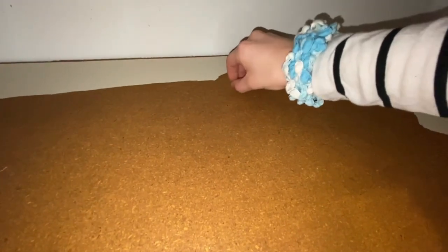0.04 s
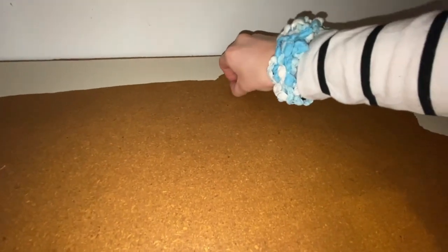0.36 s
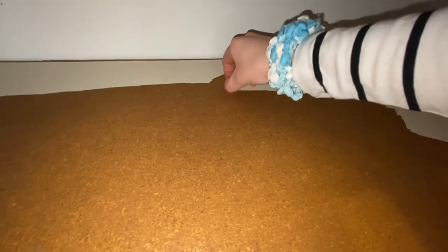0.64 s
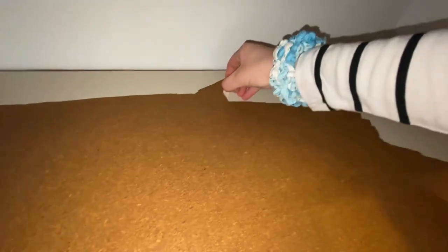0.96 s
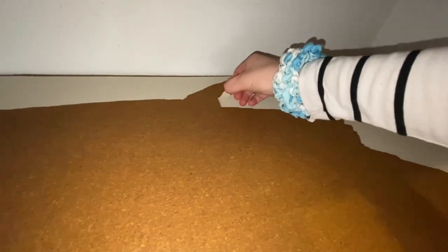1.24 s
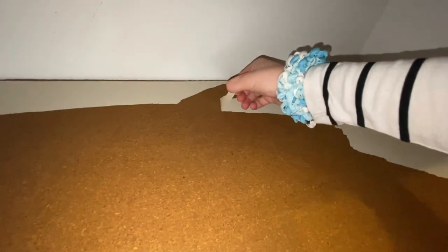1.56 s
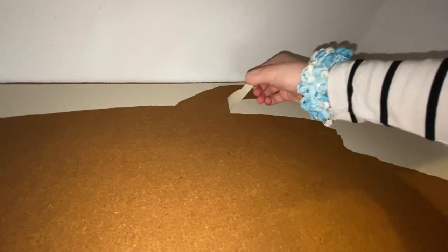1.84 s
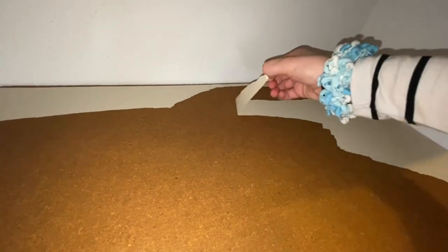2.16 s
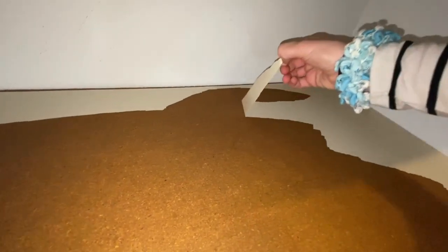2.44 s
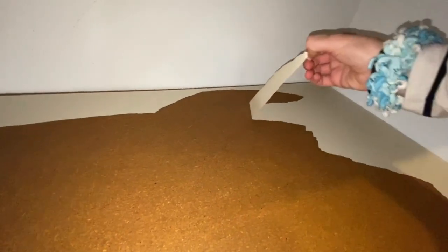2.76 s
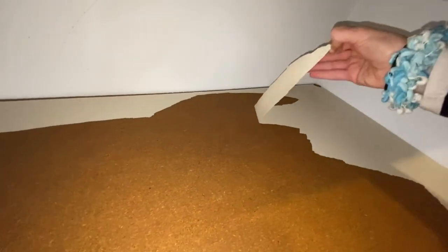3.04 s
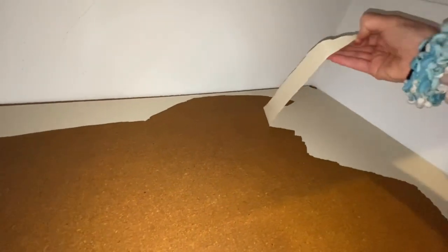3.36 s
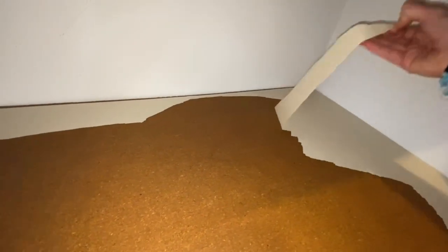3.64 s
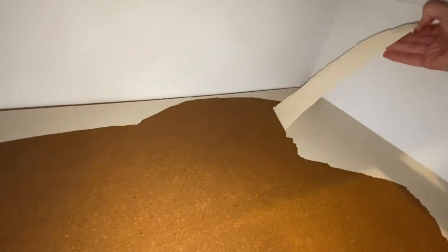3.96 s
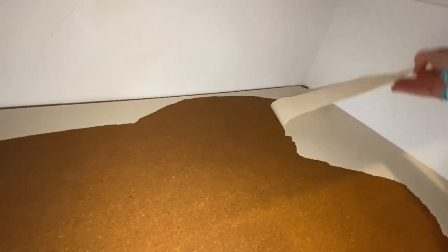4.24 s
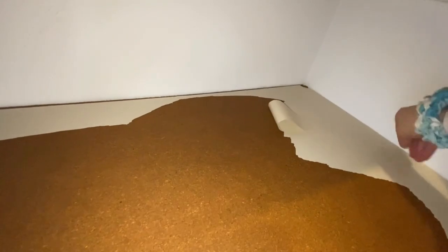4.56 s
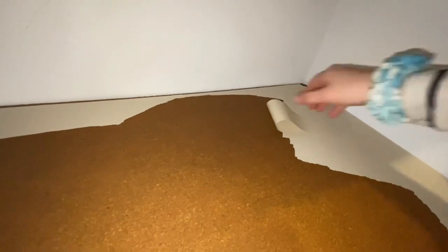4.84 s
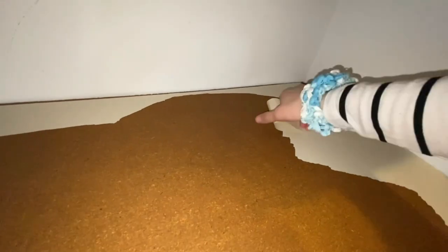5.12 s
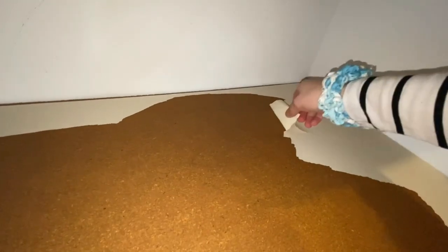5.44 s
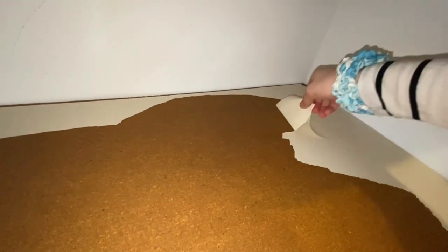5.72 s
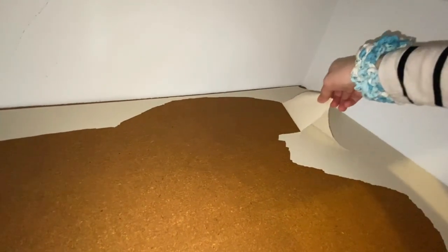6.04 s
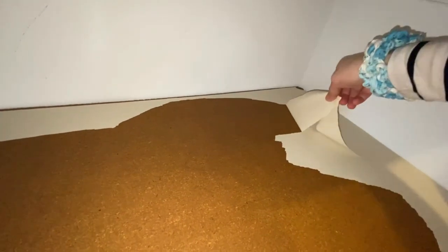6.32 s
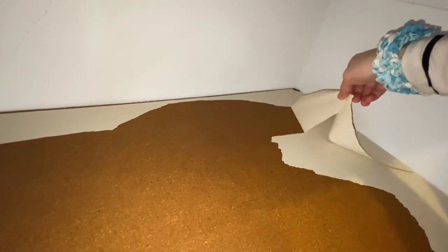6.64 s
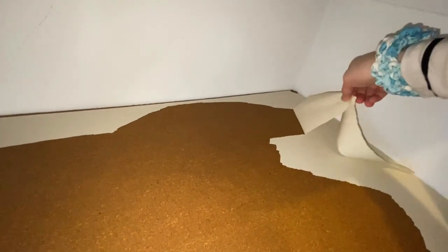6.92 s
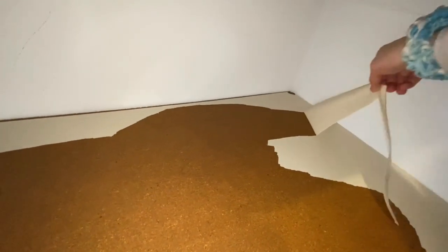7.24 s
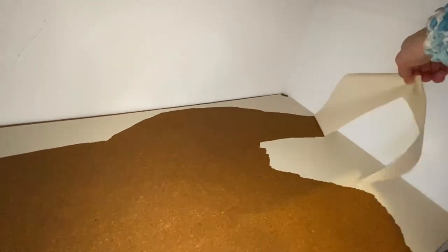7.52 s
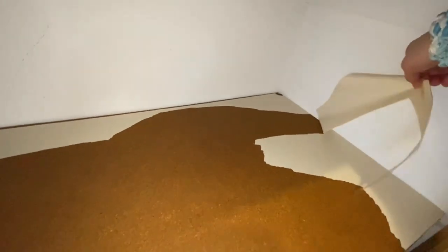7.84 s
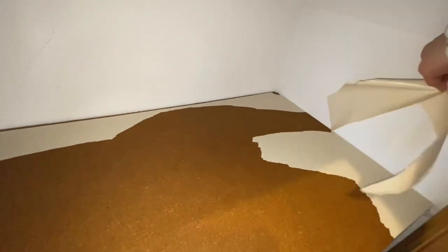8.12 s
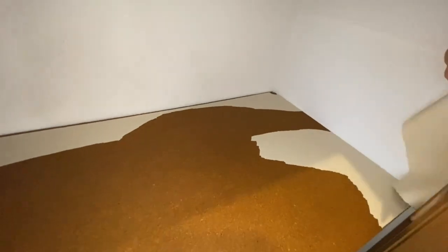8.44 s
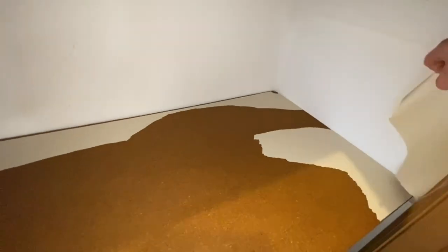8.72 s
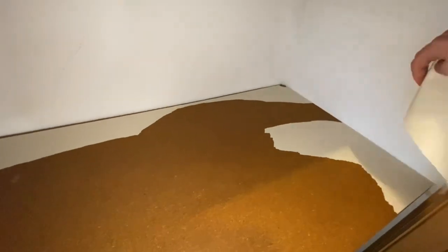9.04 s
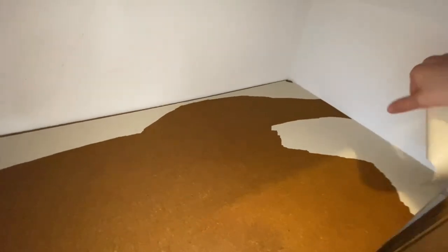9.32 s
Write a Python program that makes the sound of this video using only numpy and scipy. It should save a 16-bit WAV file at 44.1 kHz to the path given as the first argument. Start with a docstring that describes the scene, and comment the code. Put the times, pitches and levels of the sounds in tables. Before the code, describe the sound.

Faint fingertip scuffs on paper lead into a soft, fizzy crackle as a strip of shelf liner slowly unsticks. The hand bumps the closet with a low thud. After a brief lull the paper is pulled much harder, tearing off in quick, dry, uneven rips that grow denser, then crinkling and sliding over the wooden shelf once free. It is heard from close by in a small closet in a quiet house.

```python
"""In a closet, old paper liner is peeled by hand off a rough shelf. A slow pull hisses as the glue parts
in countless tiny fractures, until the strip comes free and the hand drops with a thud. A second, harder
pull goes in a run of rips, and stick-slip friction sets the shelf board humming. At the end the loose
sheet rustles as it slides and buckles, and its edge taps on the wood. The near walls reflect the sound."""
import sys
import numpy as np
from scipy import signal
from scipy.fft import rfft, irfft
from scipy.io import wavfile

SR = 44100
rng = np.random.default_rng(int(sys.argv[2]) if len(sys.argv) > 2 else 0)


def digitize_waveform(pressure):
    """Quantize a signal to 16-bit integers and store it at the path in sys.argv[1].

    Rows of a 2-D input are taken as channels; values are limited to [-1, 1].
    """
    field = np.atleast_2d(pressure).T
    bounded = np.clip(field, -1, 1)
    quanta = np.round(bounded * 32767).astype(np.int16)
    wavfile.write(sys.argv[1], SR, quanta)


N = 422478
TIME = np.arange(N) / SR


def from_db(db):
    """Amplitude ratio of a level in decibels."""
    return 10 ** (np.asarray(db) / 20)


def rms_one(x):
    """Normalisation to unit mean power."""
    return x / np.sqrt(np.mean(x ** 2) + 1e-20)


def at_hz(points, hz):
    """Interpolation on a logarithmic frequency axis."""
    points = np.array(points)
    return np.interp(np.log(np.maximum(hz, 1)), np.log(points[:, 0]), points[:, 1])


def curve(rows):
    """Gain envelope, interpolated in decibels."""
    return from_db(np.interp(TIME, *np.transpose(rows)))


def swells(rows, attack_s, release_s):
    """Envelopes with a linear attack, a hold and an exponential release."""
    out = np.zeros(N)
    for s, length, db in rows:
        attack = np.clip((TIME - s) / attack_s, 0, 1)
        release = np.exp(-np.clip((TIME - s - length) / release_s, 0, 20))
        out += from_db(db) * attack * release
    return out


def drift(rate):
    """Slow random modulation: Gaussian values, rate per second, joined by lines."""
    return np.interp(TIME * rate, np.arange(N // 20), rng.standard_normal(N // 20))


def butter(x, hz, kind, order=2):
    """Butterworth filter: a maximally flat passband."""
    sections = signal.butter(order, np.clip(hz, 10, .48 * SR), kind, fs=SR, output="sos")
    return signal.sosfilt(sections, x + 1e-18)


def coloured(x, spectrum, size=8192):
    """Minimum-phase spectral shaping; white noise keeps its power."""
    gain = rms_one(from_db(at_hz(spectrum, np.fft.rfftfreq(size, 1 / SR))))
    cepstrum = irfft(np.log(gain))[:size // 2]
    cepstrum[1:] *= 2
    return signal.oaconvolve(x, irfft(np.exp(rfft(cepstrum, size))))[:N]


def resonate(x, modes):
    """Modal superposition: damped resonators share the power of a white input."""
    out, total = 0, 0
    for k, (hz, width, db) in enumerate(modes):
        r = np.exp(-np.pi * width / SR)
        ring = signal.lfilter([1, 0, -1], [1, -2 * r * np.cos(2 * np.pi * hz / SR), r * r], x + 1e-18)
        out = out + (-1) ** k * from_db(db) * np.sqrt((1 - r * r) / 2) * ring
        total += from_db(db) ** 2
    return out / np.sqrt(total)


def fibres(per_s, spread_db, catch_db, catch_rate):
    """Shot noise of unit rms: tiny uneven breaks, swelling as the contact catches and slips."""
    sizes = from_db(spread_db * np.minimum(rng.exponential(1, N), 4)) * rng.choice([-1, 1], N)
    breaking = rng.random(N) < per_s / SR
    return rms_one(sizes * breaking * from_db(catch_db * drift(catch_rate)))


RISE_SHARE, TREBLE_HZ = .25, 6850   # build-up as a share of a burst's length; corner of its treble


def bursts(rows, crack_db):
    """Fracture avalanches: breaks build up to a sharp crack, then decay exponentially."""
    out, crackle = np.zeros(N), fibres(per_s=26000, spread_db=2, catch_db=2, catch_rate=1200)
    for s, db, length, treble_db in rows:
        at = int(s * SR)
        grains = crackle[at:at + SR // 12]
        t, rise = TIME[:len(grains)], RISE_SHARE * length
        fade = np.exp(-t / length)
        burst = rms_one(grains * fade * (1 - np.exp(-t / rise))) * np.sqrt(np.mean(fade ** 2))
        burst[int(rise * SR)] += from_db(crack_db)
        burst += (from_db(treble_db) - 1) * butter(burst, TREBLE_HZ, "high", order=1)
        out[at:at + len(burst)] += from_db(db) * burst
    return out


def blows(rows, contact_s):
    """Impact pulses: bandwidth is inversely proportional to contact time."""
    out = np.zeros(N)
    for s, db in rows:
        out[int(s * SR)] = from_db(db)
    return butter(out, 1 / (2 * contact_s), "low")


# Background of the quiet house: (frequency [Hz], spectral level [dB])
AIR_SPECTRUM = [(25, -22), (45, -4), (60, 2.5), (90, -10), (130, -10), (200, -27), (350, -24.5), (700, -34),
                (1500, -38), (3000, -47.5), (8000, -56), (16000, -59)]


def house_air():
    """Ambient noise: a low rumble, partly coherent between left and right."""
    shared, apart = (coloured(noise, AIR_SPECTRUM) for noise in rng.standard_normal((2, N)))
    return from_db(-56) * (shared + from_db(-6.5) * apart * [[1], [-1]])


# Spells of stick-slip on the board: (start [s], duration [s], level [dB])
BOARD_GROANS = [(.05, 0.089, -40), (.26, 0.017, -42), (.56, .33, -53), (1.45, 0.41, -56),
                (2.55, 0.21, -46.5), (2.92, 0.2, -42.5), (3.62, 0.19, -42.5), (5.4, 0.12, -47.5),
                (5.63, 0.11, -35.5), (5.8, 0.1, -35), (5.99, 0.27, -36), (6.46, 0.13, -32.5),
                (6.87, 0.31, -31), (7.26, 0.34, -36)]
# Modes of the shelf board: (frequency [Hz], bandwidth [Hz], level [dB])
BOARD_MODES = [(55, 6.6, -1), (92.3, 86, 4), (131, 13, 0), (181.1, 8.7, 4.5), (253, 96, 2),
               (319.8, 14.5, 3), (347, 28, -1), (520, 180, -6.5)]
BOARD_FOLLOWS = .32   # share of a tug's swing in dB that reaches the board as jolts


def shelf_board():
    """Stick-slip excitation: the peel line shakes the board's modes and sustains a wavering hum."""
    slips = fibres(per_s=1500, spread_db=1.5, catch_db=3, catch_rate=35)
    slow, hard = slow_pull(), hard_pull()
    swing = swells(BOARD_GROANS, attack_s=.024, release_s=.065) + from_db(-8) * slow + from_db(-9) * hard
    hum_hz = 125.5 + 3 * drift(22)
    tone = np.sqrt(2) * np.sin(2 * np.pi * np.cumsum(hum_hz) / SR)
    hum = swing * from_db(-4 + 1.4 * drift(35)) * tone
    rumble = from_db(-14.5) * swing * rms_one(butter(slips, 91, "low"))
    shaking = slips * (from_db(-1) * slow * curve(STRIP_GROWTH) + from_db(-16) * swing)
    jolts = butter(slips * from_db(-27.5) * hard ** BOARD_FOLLOWS, 204, "high")
    return hum + rumble + resonate(shaking + jolts, BOARD_MODES)


# Soft bumps of hand and arm on the closet: (time [s], level [dB])
HAND_BUMPS = [(0.089, -44), (4.265, -5), (9.06, -26), (9.495, -20.5), (9.54, -52)]
# Modes of the closet panels: (frequency [Hz], bandwidth [Hz], level [dB])
PANEL_MODES = [(57.3, 9.2, 2), (96, 93, 9.5), (137.2, 6.8, 6), (168.3, 12, -8), (235, 180, 4.5),
               (339.4, 9.7, -1), (694, 240, -1)]


def thuds(shudder_db, shudder_s):
    """Impact excitation: a soft blow rings the panels' low modes, and a dull shudder dies away."""
    push, t = blows(HAND_BUMPS, contact_s=.0014), TIME[:SR // 2]
    shudder = butter(rng.standard_normal(len(t)), 510, "low") * np.exp(-t / shudder_s)
    return resonate(push + from_db(shudder_db) * signal.fftconvolve(push, shudder)[:N], PANEL_MODES)


# Small dry ticks close to the listener: (time [s], level [dB])
NEAR_TICKS = [(0.1216, -45), (.187, -53), (0.195, -32.5), (0.2067, -32.5), (0.228, -38), (.262, -56),
              (.27, -50), (.389, -50), (.564, -54), (0.8704, -50), (4.47, -26.5)]


def near_ticks():
    """Short contact: a very brief pulse reaches far into the treble and is heard as a bright tick."""
    return butter(blows(NEAR_TICKS, contact_s=.00005), [4500, 9500], "band")


# The hand nudges the paper against the wood: (time [s], level [dB], decay time [s])
HAND_SCUFFS = [(0.33, -45.5, 0.017), (0.786, -44, 0.016), (0.868, -49.5, .008), (4.083, -64, 0.0067),
               (4.391, -43, 0.013), (5.195, -44.5, 0.0076), (5.352, -42.5, .012)]
# Passband of a scuff: (lower edge [Hz], upper edge [Hz])
SCUFF_BAND = [350, 2230]
# Fingertips feel for the paper's edge: (start [s], duration [s], level [dB])
FINGER_STROKES = [(.68, 0.017, -61), (5.078, 0.01, -62), (5.2, 0.01, -57), (5.243, 0.06, -55),
                  (5.38, .04, -49)]
# Skin rubbing on paper: (frequency [Hz], spectral level [dB])
SKIN_SPECTRUM = [(500, -41), (1200, -12), (2500, -4.5), (4300, 0.5), (5500, -3), (7500, -4), (10000, -8.5),
                 (16000, -13)]


def fingers():
    """Friction noise: skin brushes brightly over paper, and paper scuffs dully against wood."""
    friction = fibres(per_s=9000, spread_db=1.5, catch_db=1.5, catch_rate=120)
    scuffs = bursts([(s, db, length, 0) for s, db, length in HAND_SCUFFS], crack_db=-3)
    strokes = swells(FINGER_STROKES, attack_s=.0067, release_s=.035)
    return coloured(strokes * friction, SKIN_SPECTRUM) + from_db(4) * butter(scuffs, SCUFF_BAND, "band")


# Pace of the slow pull, as the strength of its fizz: (time [s], level [dB])
PULL_LEVELS = [(.45, -84), (.61, -61.5), (.73, -63), (.8, -49.5), (.85, -64.5), (.95, -55), (1.14, -60.5),
               (1.27, -50), (1.39, -56), (1.52, -48.5), (1.82, -48.5), (1.9, -45), (1.95, -48),
               (2.04, -45.5), (2.14, -51.5), (2.3, -42.5), (2.38, -45), (2.47, -43), (2.66, -44.5),
               (2.82, -51.5), (2.89, -43), (3.04, -48.5), (3.16, -39), (3.29, -49), (3.37, -43.5),
               (3.49, -50), (3.62, -39.5), (3.83, -52.5), (4.04, -68.5), (4.2, -93)]


def slow_pull():
    """Amplitude envelope of the slow pull, ending as the strip comes free."""
    return curve(PULL_LEVELS) * (TIME < PULL_LEVELS[-1][0])


# Parting glue: (frequency [Hz], spectral level [dB])
GLUE_SPECTRUM = [(150, -15), (400, -27), (800, -14.5), (1200, -13), (1600, -6), (2100, -4.5), (3000, -6.5),
                 (3500, -5), (3900, -5), (5000, -5.5), (6700, 2.5), (8000, -2.5), (9300, -4.5),
                 (12000, -5.5), (16000, -11)]
# Lows and mids of the strip, thin while it is short: (time [s], level [dB])
STRIP_GROWTH = [(.6, -4.5), (1.3, -12), (2.0, 0), (3.6, 1.5)]


def slow_peel():
    """Acoustic emission of parting glue and fibres; returns the fizz and the force on the sheet."""
    pull, body = slow_pull(), curve(STRIP_GROWTH)
    fine = pull * fibres(per_s=5100, spread_db=-3, catch_db=2.5, catch_rate=190)
    coarse = pull * fibres(per_s=300, spread_db=2, catch_db=2.5, catch_rate=60)
    breaks = from_db(-.5) * fine + from_db(-2) * coarse
    ring = peel_line_ring(breaks, hz=5270, width_hz=160, spread=.016, rate=6.4)
    fizz = coloured(breaks, GLUE_SPECTRUM) + from_db(-11) * ring
    fizz += (body - 1) * butter(fizz, 7300, "low", order=1)
    return fizz, from_db(-12) * body * butter(coarse + fine, 710, "high")


def peel_line_ring(x, hz, width_hz, spread, rate):
    """Time-varying resonance: paper beside the peel line wanders in pitch as the line travels."""
    pitch_hz = hz * np.exp(spread * drift(rate))
    turn = np.exp(2j * np.pi * np.cumsum(pitch_hz) / SR)
    r = np.exp(-np.pi * width_hz / SR)
    return np.sqrt(2 * (1 - r * r)) * np.imag(turn * signal.lfilter([1], [1, -r], x / turn + 1e-18))


# Modes of the taut sheet and the air over the shelf: (frequency [Hz], bandwidth [Hz], level [dB])
SHEET_MODES = [(353.5, 16, -1), (476, 28, -2.5), (563, 23, -4), (621, 6.3, -9), (748, 39, -2),
               (923, 26, -9.5), (1073, 59, -2), (1364, 470, -4.5), (1960, 50, -11)]


def taut_sheet(force):
    """Forced vibration: breaks at the peel line ring the stretched paper."""
    return resonate(force, SHEET_MODES)


def sharp_cracks():
    """Brittle fracture: one impulse opens each rip or crinkle, and others fall at random."""
    cracks = np.zeros(N)
    for s, db, length, treble_db in GLUE_RIPS + BUCKLES:
        cracks[int((s + RISE_SHARE * length) * SR)] = from_db(db + 11 + .53 * treble_db)
    for pace, per_s, db in [(hard_pull(), 130, 3),      # fibres snap
                            (slow_pull(), 150, -7.5),   # threads of glue part
                            (sliding(), 70, -9.5)]:     # tiny creases tick
        cracks += from_db(db) * pace * fibres(per_s=per_s, spread_db=2, catch_db=2, catch_rate=30)
    return butter(cracks, [3000, 14000], "band", order=1)


# Patches of glue let go at once: (time [s], level [dB], decay time [s], treble gain [dB])
GLUE_RIPS = [(0.872, -42, 0.0016, 6.5), (1.022, -44.5, 0.0048, -20), (1.421, -48.5, 0.0049, 13),
             (1.49, -53, 0.0016, 14), (1.704, -41, 0.006, -10), (1.766, -43.5, 0.0016, 1),
             (1.983, -32, 0.0069, -21), (2.045, -40, 0.0017, 2), (2.639, -34.5, 0.0024, 8),
             (3.364, -32.5, 0.0084, -2), (3.44, -41, .002, 8), (3.5665, -20.5, 0.004, 0),
             (3.613, -27.5, 0.014, -7), (5.425, -23, .005, -4), (5.4694, -16.5, 0.0022, -1),
             (5.522, -22, 0.0018, -23), (5.5525, -15, 0.0033, 5), (5.578, -17, 0.0024, 0),
             (5.5992, -10, 0.00083, -3.5), (5.6396, -17.5, 0.0016, -3), (5.654, -15.5, 0.0026, 1),
             (5.742, -17.5, 0.0037, -3), (5.8052, -14.5, 0.0023, -2), (5.9474, -13.5, 0.0035, -4),
             (5.9706, -17.5, 0.003, -1), (5.9891, -29, 0.0021, 7), (6.026, -17.5, 0.0024, -4),
             (6.0552, -10.5, 0.0024, 1), (6.068, -14.5, 0.0038, -1), (6.118, -13, 0.0035, -1),
             (6.1527, -17.5, 0.0015, 3.5), (6.192, -9, 0.0033, 3.5), (6.253, -25, 0.0045, -5),
             (6.308, -32, .002, 0), (6.379, -20, 0.0013, -14), (6.3983, -9.5, 0.0018, 0),
             (6.4424, -13, 0.0028, 0.5), (6.4766, -16.5, 0.003, -2), (6.521, -20, 0.0023, -4),
             (6.542, -17, 0.0025, -10), (6.7194, -25.5, 0.0018, -4), (6.76, -35, 0.0015, 1),
             (6.8102, -19.5, 0.0056, -3), (6.8647, -24, 0.0041, -15), (6.892, -26, 0.0017, -3),
             (6.8972, -9, 0.0022, 2), (6.935, -17, 0.0032, -1), (6.985, -13.5, 0.0019, 7),
             (7.0164, -15, 0.0018, -1), (7.051, -20.5, 0.0017, 6), (7.0647, -18.5, 0.0027, 7),
             (7.179, -18, 0.0032, 5.5), (7.2096, -11.5, 0.0051, -1), (7.2384, -10, 0.0016, -2),
             (7.284, -13, 0.0017, -15), (7.339, -15, 0.0032, -21), (7.373, -10.5, 0.0036, -11),
             (7.404, -14.5, 0.0043, 6.5), (7.428, -13, 0.0058, 4), (7.459, -15.5, 0.0049, 4),
             (7.497, -7, 0.0023, 2), (7.527, -13.5, 0.0052, 3.5), (7.6014, -11.5, 0.0031, 0.5),
             (7.6264, -6.5, 0.0014, 0), (7.7125, -8, 0.0027, -8), (7.7312, -11.5, 0.0017, 0.5),
             (7.789, -5.5, 0.0036, 2.5), (7.802, -13, .004, 1), (7.866, -6.5, 0.0054, -3),
             (7.895, -6, 0.0058, -15), (7.921, -14, 0.0053, -12), (7.9457, -11, 0.0023, -7),
             (7.952, -7, 0.0053, -5), (7.981, -16.5, 0.0022, 4), (7.995, -6, 0.0047, -4.5),
             (8.014, -15, 0.0087, 0.5), (8.034, -13, .005, -8), (8.103, -8.5, 0.0076, 1),
             (8.13, -12.5, 0.0027, -17), (8.1787, -12.5, 0.0027, 1), (8.2198, -11.5, 0.0018, -2),
             (8.2428, -14.5, 0.0013, 6), (8.2681, -13, 0.0044, 2.5)]
# A sudden rip: (frequency [Hz], spectral level [dB])
RIP_SPECTRUM = [(200, -14), (600, -6.5), (1400, -4), (2000, 0), (3000, -0.5), (4700, -0.2), (7000, -1.5),
                (8400, -3), (9700, -4.5), (12000, -7.5), (16000, -13.5)]
# Coarse tearing: (frequency [Hz], spectral level [dB])
TEAR_SPECTRUM = [(200, -18.5), (500, -21.5), (1300, -9.5), (2000, -0.5), (2900, -4), (5000, -3),
                 (7000, -1.5), (8300, -4), (9700, -9.5), (12000, -10.5), (16000, -26)]
# Colour of the short, stiff flap: (frequency [Hz], gain [dB])
FLAP_SPECTRUM = [(480, 4), (610, 7), (900, -6.5), (1400, -2), (2000, 4.5), (2900, 0), (3400, 3.5),
                 (4000, -3.5), (5000, 0), (7000, -0.5), (9200, 1), (16000, 1.5)]
# The flap lengthens and loses that colour: (start [s], end [s])
FLAP_GROWTH = [6.76, 7.1]
# Drive to the sheet's modes, strong when taut and weak when slack: (time [s], level [dB])
SHEET_TAUTNESS = [(2.0, -5), (3.6, -4.5), (5.6, -16), (6.9, -11.5), (7.25, -7), (7.5, -12), (7.8, -9.5),
                  (8.0, -20.5), (8.3, -53)]


def ripping():
    """Unstable peeling: rips in both pulls, tearing in the hard one; returns crackle and sheet force."""
    tearing = hard_pull() * fibres(per_s=5000, spread_db=2.5, catch_db=3, catch_rate=330)
    rips = bursts(GLUE_RIPS, crack_db=14)
    crackle = coloured(from_db(4) * tearing, TEAR_SPECTRUM) + coloured(from_db(-1.5) * rips, RIP_SPECTRUM)
    stiff = np.interp(TIME, FLAP_GROWTH, [1, 0])
    crackle = coloured(stiff * crackle, FLAP_SPECTRUM) + (1 - stiff) * crackle
    # small breaks are too quick to move the lowest modes much
    shake = from_db(16) * butter(tearing, 676, "high") + from_db(5) * butter(rips, 780, "high", order=1)
    return crackle, curve(SHEET_TAUTNESS) * shake


# The sheet's edge touches the wood: (time [s], level [dB])
EDGE_TAPS = [(4.077, -48.5), (5.345, -47.5), (8.758, -36), (8.968, -28.5), (9.058, -30.5), (9.121, -35),
             (9.158, -41.5), (9.251, -33.5), (9.304, -35.5), (9.346, -37), (9.403, -29.5), (9.494, -29.5)]
# Modes of the loose edge: (frequency [Hz], bandwidth [Hz], level [dB])
EDGE_MODES = [(292, 115, -7), (553, 57, -3.5), (732, 53, -0.5), (1380, 660, -4.5)]


def edge_taps(pitch_spread=.025, skid_db=-24.5, skid_s=.0076):
    """Impact and skid ring the edge; it is bent differently at each tap, which shifts its modes."""
    out, t = 0, TIME[:SR // 16]
    bends = np.exp(pitch_spread * rng.standard_normal(len(EDGE_TAPS)))
    for (s, db), bend in zip(EDGE_TAPS, bends):
        touch = blows([(s, db)], contact_s=.00082)
        skid = from_db(db + skid_db) * np.exp(-t / skid_s) * rng.standard_normal(len(t))
        touch[int(s * SR):][:len(t)] += skid
        out = out + resonate(touch, [(hz * bend, width, level) for hz, width, level in EDGE_MODES])
    return out


# Freed paper slides over the shelf: (start [s], duration [s], level [dB])
PAPER_SLIDES = [(4.26, 0.049, -58.5), (8.3, 0.068, -38), (8.43, 0.135, -44.5), (8.652, 0.16, -46.5),
                (8.89, 0.13, -47), (9.06, 0.025, -44.5), (9.225, 0.38, -48)]


def sliding():
    """Amplitude envelope of the paper's sliding friction."""
    return swells(PAPER_SLIDES, attack_s=.013, release_s=.049)


# The free paper buckles: (time [s], level [dB], decay time [s], treble gain [dB])
BUCKLES = [(4.394, -50.5, 0.039, -2), (4.461, -42, 0.0069, -12), (8.398, -16, 0.011, 2),
           (8.489, -29, 0.0055, 5), (8.529, -36.5, 0.0037, 8.5), (8.554, -36, 0.0038, 11.5),
           (8.652, -39.5, 0.006, 7.5), (8.753, -21.5, 0.011, -8), (8.8078, -18, 0.0023, -1),
           (8.893, -40, 0.0038, 15), (8.911, -35, 0.017, 9), (9.0562, -24, 0.00523, -8),
           (9.304, -37, 0.0035, 2), (9.347, -37.5, 0.0055, 1), (9.41, -22.5, 0.0034, -22),
           (9.5, -33, 0.0064, 0), (9.528, -23, 0.0031, 2), (9.532, -17, 0.0037, 0.5)]
# Rustling paper: (frequency [Hz], spectral level [dB])
RUSTLE_SPECTRUM = [(100, -15), (200, -12), (400, -9.5), (700, 3), (1200, 7), (1800, 4), (3300, 7.5),
                   (4400, 5), (7000, 3), (9500, -3), (12000, -4.5), (16000, -29)]


def loose_sheet():
    """Friction and buckling: the freed paper rustles, and both excite the modes of its edge."""
    rubbing = sliding() * fibres(per_s=5000, spread_db=-1.5, catch_db=4, catch_rate=67)
    buckling = bursts(BUCKLES, crack_db=11)
    flutter = resonate(from_db(-24) * buckling + from_db(-25) * rubbing, EDGE_MODES)
    return coloured(rubbing + from_db(-.5) * buckling, RUSTLE_SPECTRUM) + flutter


# Tugs of the hard pull: (start [s], duration [s], level [dB])
HARD_TUGS = [(5.42, 0.22, -53), (5.63, 0.16, -40), (5.95, 0.05, -39), (6.06, 0.045, -39),
             (6.38, 0.16, -44.5), (6.89, 0.16, -46.5), (7.05, 0.043, -35), (7.18, 0.17, -36),
             (7.36, 0.12, -32), (7.86, 0.043, -37)]


def hard_pull(creep_db=-53.5):
    """Amplitude envelope of the hard pull: tugs on a steady creep that lasts until the final rip."""
    holding = (TIME > HARD_TUGS[0][0]) & (TIME < GLUE_RIPS[-1][0])
    return swells(HARD_TUGS, attack_s=.012, release_s=.058) + from_db(creep_db) * holding


# Likeness of the reflections at left and right: (frequency [Hz], correlation [1])
COHERENCE = [(150, 0.96), (330, 0.03), (480, -0.1), (650, -0.38), (950, -0.19), (1400, -0.22), (2000, 0.12),
             (3200, 0.032), (8000, 0.1)]
# Left level minus right level: (frequency [Hz], level [dB])
STEREO_BALANCE = [(150, 0.5), (350, 4), (900, 1), (2500, 2), (6000, 4), (9000, -0.5), (12000, -1),
                  (16000, 0.5)]
# Decay of the closet: (frequency [Hz], reverberation time [s])
REVERB_TIMES = [(200, 0.61), (700, 0.35), (2000, 0.17), (6000, 0.12), (15000, 0.12)]
ECHO_S, ECHO_DB = .0135, -11   # reflection from the far wall
TAIL_T60_S, TAIL_DB = .55, -27   # reverberation of the room outside
RIGHT_LAG, TOP_LAG = 20, 10   # [samples]: direct sound on the right, top octave on the left


def closet(x, direct_db, near_db, near_s, moving, size=16384, stretches=80):
    """Reverberation: direct sound plus reflections, whose moving share varies as the peel line travels."""
    t, hz = TIME[:size], np.fft.rfftfreq(size, 1 / SR)
    alike = at_hz(COHERENCE, hz)
    centres, t60s = np.transpose(REVERB_TIMES)
    bands = np.array([at_hz(list(zip(centres, weights)), hz) for weights in np.eye(len(centres))])
    ring = from_db(-60 * t / t60s[:, None])
    tail = from_db(TAIL_DB - 60 * t / TAIL_T60_S)
    near_walls = from_db(near_db) * np.exp(-t / near_s)
    echo = from_db(ECHO_DB) * (t > ECHO_S) * np.exp(-np.abs(t - ECHO_S) / near_s)
    decay = ring + tail + near_walls + echo
    decay /= np.sqrt(np.sum(decay ** 2) / len(centres))
    delay = np.exp(-2j * np.pi * hz / SR)   # one sample
    direct_gain = from_db(direct_db - 2 * np.clip(hz / 12000, 0, 1))
    direct = direct_gain * np.array([delay ** 0, delay ** RIGHT_LAG])
    balance = from_db(at_hz(STEREO_BALANCE, hz) / 2 * [[1], [-1]])
    top = np.interp(hz, [8500, 10500], [0, 1])
    still = np.sqrt(1 - moving) * rng.standard_normal((2, size))
    out = np.zeros((2, N + size))
    for part in np.array_split(np.arange(N), stretches):
        mid, side = rfft(still + np.sqrt(moving) * rng.standard_normal((2, size)))
        field = np.sqrt(1 + alike) * mid + np.sqrt(1 - alike) * side * [[1], [-1]]
        reflections = np.sum(irfft(field[:, None] * bands) * decay, axis=1)
        paths = direct + rfft(reflections)
        # in the top octave both channels carry one signal, late and inverted on the left
        paths[0] = np.sqrt(1 - top) * paths[0] - np.sqrt(top) * paths[1] * delay ** TOP_LAG
        response = irfft(paths * balance) * (1 - t / t[-1])
        out[:, part[0]:part[-1] + size] += signal.fftconvolve(x[None, part], response, axes=1)
    return out[:, :N]


def scene():
    """Superposition of the reverberant paper, the direct sound of the wood and the quiet house."""
    fizz, tremble = slow_peel()
    crackle, shake = ripping()
    ticks = from_db(10) * near_ticks()
    paper = fizz + crackle + loose_sheet() + from_db(22) * edge_taps() + fingers() + from_db(2) * ticks
    paper = closet(paper, direct_db=-6.5, near_db=3.5, near_s=.0036, moving=.91)
    cracks = closet(sharp_cracks(), direct_db=-7, near_db=21, near_s=.0014, moving=.9, size=8192)
    sheet = closet(taut_sheet(tremble + shake), direct_db=-19.5, near_db=11, near_s=.0098, moving=.57)
    close = shelf_board() + from_db(12) * thuds(shudder_db=-28.5, shudder_s=.056) + ticks
    close = np.array([from_db(1) * close, from_db(-.65) * np.pad(close, (RIGHT_LAG, 0))[:N]])
    return paper + cracks + sheet + close + house_air()


def record(dry):
    """Band limiting and soft saturation: the deepest bass is cut, peaks are rounded, the top is cut."""
    rounded = .85 * np.tanh(butter(dry, 40, "high", order=3) / .85)
    return signal.sosfilt(signal.ellip(10, .2, 90, 15900, fs=SR, output="sos"), rounded)


dry = scene()
out = record(dry)
digitize_waveform(out)
```